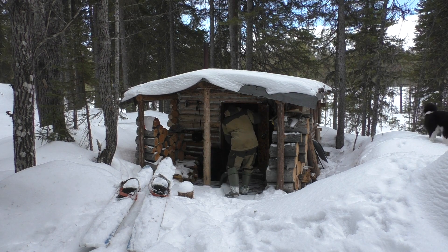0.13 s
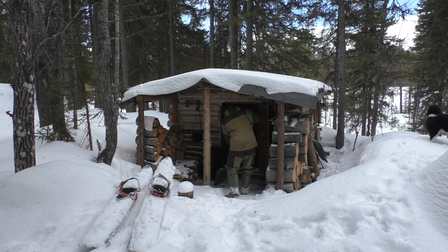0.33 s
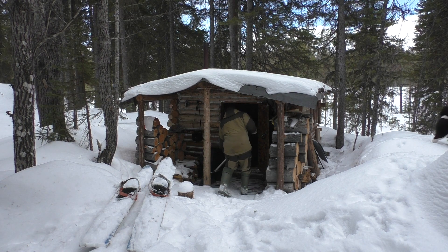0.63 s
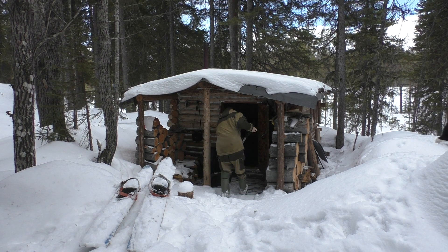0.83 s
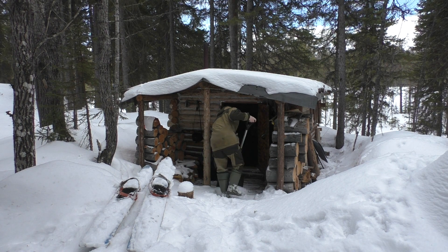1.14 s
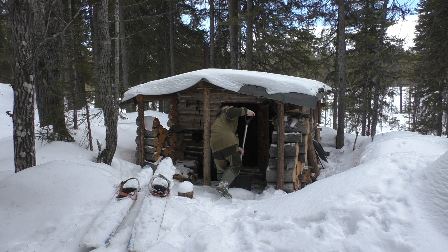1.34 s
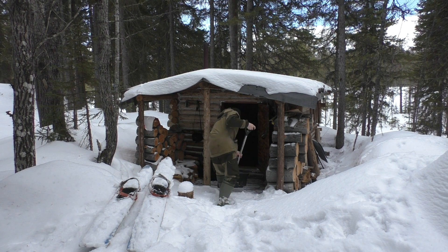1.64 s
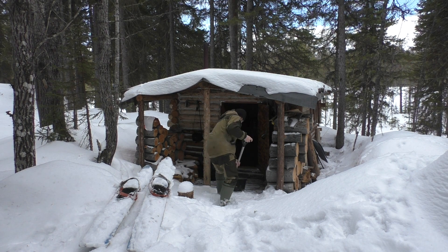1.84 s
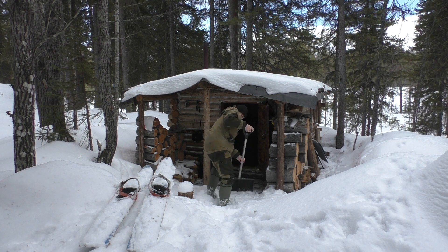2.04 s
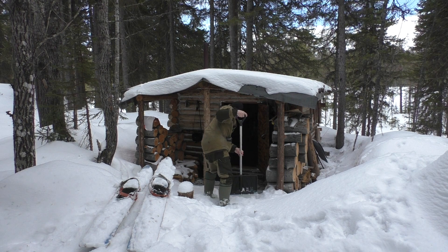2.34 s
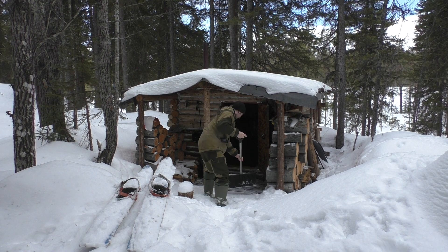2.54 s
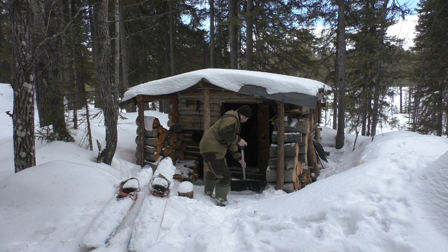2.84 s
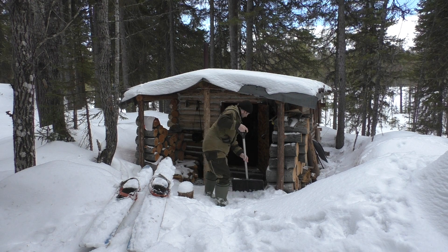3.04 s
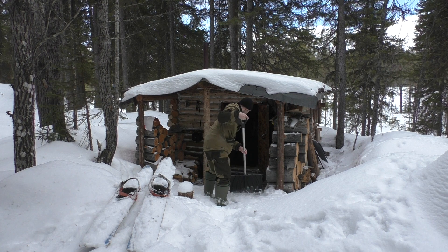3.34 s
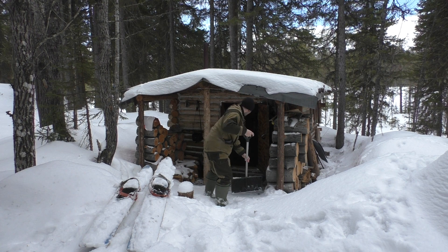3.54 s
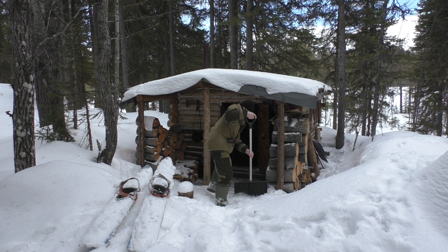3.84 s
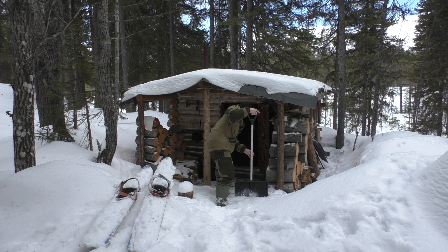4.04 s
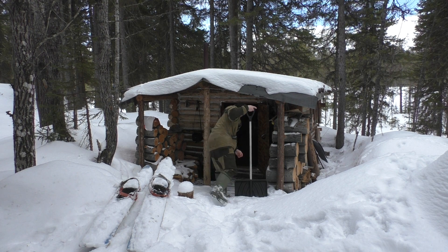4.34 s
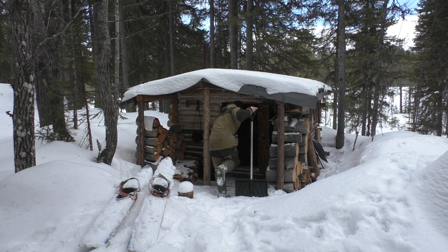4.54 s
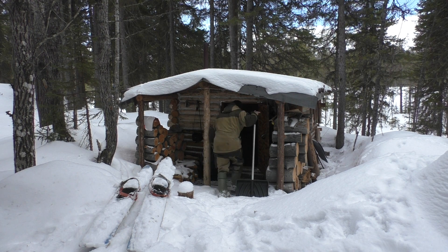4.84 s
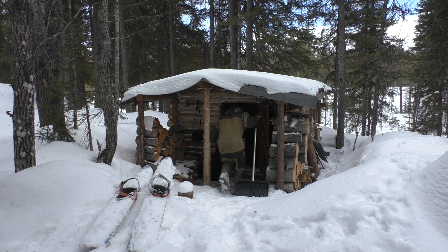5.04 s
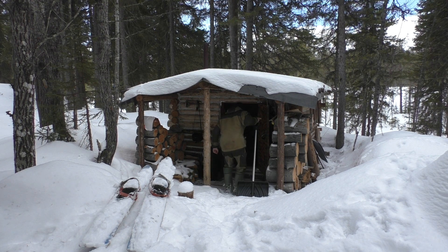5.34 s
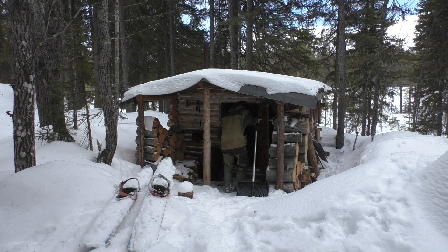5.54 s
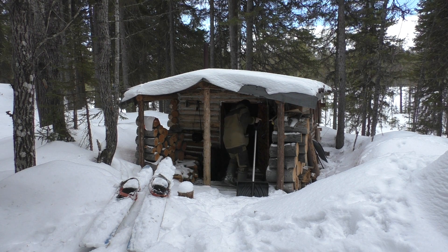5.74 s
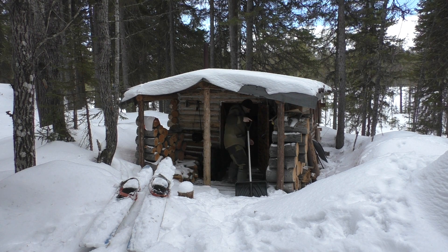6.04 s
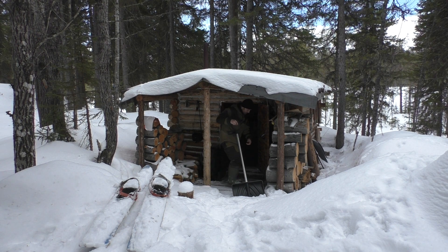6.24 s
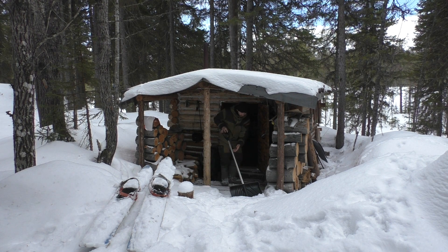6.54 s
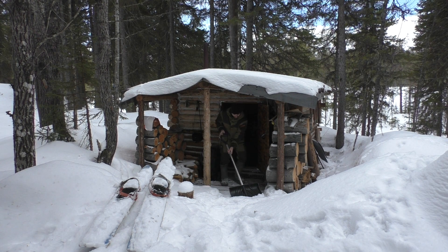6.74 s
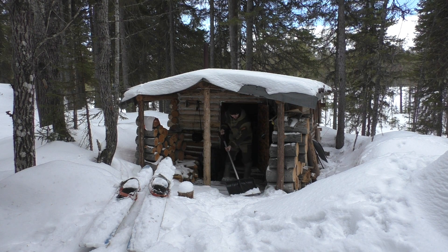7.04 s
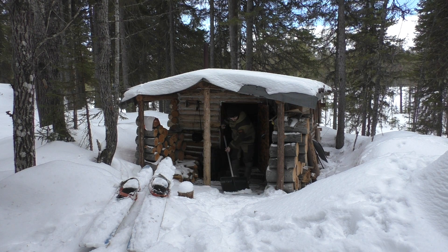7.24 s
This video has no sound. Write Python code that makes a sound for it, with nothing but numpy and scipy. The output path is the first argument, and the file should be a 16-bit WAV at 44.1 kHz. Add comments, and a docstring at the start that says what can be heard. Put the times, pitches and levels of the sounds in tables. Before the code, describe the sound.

Faint air hiss and low rumble lie under gritty shovel work outside a wooden hut. The plastic blade lands with dull knocks, shudders over hard crust and grates through icy grains, with pauses between strokes. Short dry scrapes end the work, then cloth brushes and boots thump on the floorboards over crunching snow. Quiet shuffling follows before the shovel briefly scrapes again. Outdoor mono pickup, fairly dry, with a slight echo of logs and trees.

```python
"""Snow is cleared at the door of a log hut in a quiet winter forest, over a faint hiss and rumble of air.
For four seconds a plastic shovel lands with knocks (fading tones), judders over the crust and scrapes
through icy grains (random clicks through the blade's resonances), with two soft footsteps in between.
Then clothes rustle (shaped noise) and boots thud on a wooden floor (fading board tones) over crunching snow.
Near the end the shovel gives one last short scrape and knock."""
import sys
import numpy as np
from scipy import signal
from scipy.fft import rfft, irfft, next_fast_len
from scipy.io import wavfile
from scipy.ndimage import uniform_filter1d, map_coordinates

SR = 44100
rng = np.random.default_rng(int(sys.argv[2]) if len(sys.argv) > 2 else 0)


def output_pcm(signal):
    """Save a mono or channel-first signal as 16-bit PCM at the path in sys.argv[1].

    Samples are clipped to [-1, 1] before scaling.
    """
    pcm = np.clip(np.atleast_2d(signal).T, -1, 1) * 32767
    wavfile.write(sys.argv[1], SR, np.round(pcm).astype(np.int16))


N = 325458  # length in samples


def amp(db):
    """Turn decibels into gain."""
    return 10 ** (np.asarray(db) / 20)


def unit(x):
    """Scale to an average (rms) level of 1."""
    return x / np.sqrt(np.mean(x ** 2) + 1e-20)


def along(points, hz):
    """Read a curve of (Hz, value) points, with pitch on a log axis."""
    f, v = np.transpose(points)
    return np.interp(np.log(hz + 1), np.log(f + 1), v)


def add(track, s, sound):
    """Mix a sound into the track at time s, in seconds."""
    part = track[max(round(s * SR), 0):][:len(sound)]
    part += sound[:len(part)]


def bump(t, rise, length):
    """Gain that rises in a straight line, holds for about length and falls away."""
    return np.minimum(t / rise, 1) / (1 + (t / length) ** 4)


def burst(s, length, rise=0.0026):
    """A whole track of gain with one bump at time s."""
    gain, t = np.zeros(N), np.arange(SR // 2) / SR
    add(gain, s, bump(t, rise, length))
    return gain


# loose crumbs trickle on after a push: starting level against full force, then how fast it fades
SPILL_DB, SPILL_DB_PER_S = -21, 110


def push(s, rise, hold, release_db_per_s, sag_db_per_s):
    """Gain of one push: force builds, sags while held, then lets go and leaves a faint trickle."""
    gain, t = np.zeros(N), np.arange(SR) / SR
    after = np.maximum(t - rise - hold, 0)
    force = np.minimum(t / rise, 1) * amp(-sag_db_per_s * np.clip(t - rise, 0, hold))
    release = amp(-release_db_per_s * after)
    spill = amp(SPILL_DB - SPILL_DB_PER_S * after)
    add(gain, s, force * np.maximum(release, spill))
    return gain


def wobble(rate):
    """A smooth random curve with rate random points a second."""
    points = rng.standard_normal(int(N * rate / SR) + 4)
    return map_coordinates(points, [np.arange(N) / SR * rate])


def filtered(x, response):
    """Multiply the spectrum of x by a response that depends on frequency."""
    m = next_fast_len(N + SR // 2)
    return irfft(rfft(x, m) * response(np.fft.rfftfreq(m, 1 / SR)), m)[:N]


def coloured(x, spectrum):
    """Shape x with a spectrum of (Hz, dB) points, at rms 1."""
    return unit(filtered(x, lambda hz: amp(along(spectrum, hz))))


def rung(x, modes):
    """Let x ring a body's resonances, at rms 1; neighbouring ones have opposite signs."""
    def response(f):
        total = 0
        for k, (centre, width, db) in enumerate(modes):
            damping = 1j * f * width
            total = total + (-1) ** k * amp(db) * damping / (centre ** 2 - f * f + damping)
        return total
    return unit(filtered(x, response))


def grains(rate, spread_db, clump_db):
    """Tiny fractures, about rate a second, of random size that swell in clumps, at rms 1."""
    hits = rng.random(N) < rate / SR
    size = amp(spread_db * rng.standard_normal(N) + clump_db * wobble(260))
    return unit(hits * size * rng.choice([-1, 1], N))


def patchy(x, depth_db, count=5):
    """Each band swells and fades on its own as the contact point and the load move, at rms 1."""
    z = signal.stft(x, nperseg=1024)[2]
    field = rng.standard_normal(z.shape)
    for axis in (0, 1):  # smooth over pitch, then over time
        field = uniform_filter1d(field, count, axis=axis)
    return unit(signal.istft(z * amp(depth_db * unit(field)), nperseg=1024)[1][:N])


# Colour of the hiss of still air: f/Hz, level/dB (per Hz)
AIR_COLOUR = [(12, -17), (20, 8.5), (44, 0.5), (187, -13.5), (443, -15), (843, -20.5), (1150, -21),
              (1430, -24), (2800, -27), (4020, -27.5), (9830, -33.5), (14500, -41.5), (15800, -42)]
AIR_DB = -52


def forest():
    """Still air: steady noise makes a faint hiss, and low noise of wavering level a rumble."""
    hiss = amp(AIR_DB) * coloured(rng.standard_normal(N), AIR_COLOUR)
    rumble = coloured(rng.standard_normal(N), [(25, -5), (70, -8), (200, -25), (800, -50)])
    return hiss + amp(-66.5 + 2.4 * wobble(7.7)) * rumble


# Movements of the body: t/s, hold/s, rustle level/dB, shuffling level/dB
BODY_MOVES = [(4.171, 0.22, -57, -52), (4.56, 0.21, -46.5, -50), (4.941, 0.14, -46.5, -51),
              (6.117, 0.25, -61, -73), (6.505, 0.29, -58.5, -52), (6.95, 0.089, -51, -53)]
# Colour of brushing cloth: f/Hz, level/dB (per Hz)
CLOTH_COLOUR = [(120, -0.5), (200, 0.5), (923, -9.5), (1590, -10.5), (1910, -8), (2850, -15), (3890, -12.5),
                (9310, -30), (15500, -41)]
# Colour of shuffling feet: f/Hz, level/dB (per Hz)
SHUFFLE_COLOUR = [(12, -53), (20, 1), (43, -5), (81, 13), (135, -17.5), (500, -10), (650, -53),
                  (1100, -120)]
MOVE_RISE_S, MOVE_FADE_DB_PER_S = 0.037, 117  # a move starts softly and dies away


def rustle():
    """A jacket brushes (grains) and feet shuffle (noise) on the way into the hut; each move swells and fades."""
    brush, shuffle = np.zeros((2, N))
    for s, hold, cloth_db, shuffle_db in BODY_MOVES:
        # a negative sag: the motion grows slightly while held
        motion = push(s, MOVE_RISE_S, hold, MOVE_FADE_DB_PER_S, sag_db_per_s=-2)
        brush += amp(cloth_db) * motion
        shuffle += amp(shuffle_db) * motion
    cloth = patchy(coloured(grains(rate=5000, spread_db=3.0, clump_db=1.7), CLOTH_COLOUR), depth_db=3.0)
    feet = coloured(rng.standard_normal(N), SHUFFLE_COLOUR)
    folds = amp(0.36 * wobble(25))
    return folds * (brush * cloth + shuffle * feet)


# Boots landing: t/s, thud level/dB, crunch level/dB, crunch length/s
BOOT_STEPS = [(1.657, -31, -47.5, 0.091), (2.514, -36, -55, 0.087), (4.376, -30, -49.5, .044),
              (4.839, -37, -43.5, 0.015), (4.894, -58, -46, 0.015), (4.958, -45, -48, 0.068),
              (5.01, -11, -27, 0.029), (5.404, -12, -36, 0.039), (5.677, -15, -42, 0.027),
              (6.123, -47, -49.5, 0.054), (6.677, -37, -54, 0.042), (7.006, -36.5, -54, 0.049)]
# Tones of the floor boards: f/Hz, level/dB (against the thud), time to fall 60 dB/s
FLOOR_BOARDS = [(45, -4.5, 0.17), (53.3, -25, 0.94), (80, 0.5, 0.067), (127.6, -0.5, 0.046),
                (193, -10, 0.045), (293, -17, 0.055)]
# Colour of snow crunching under a sole: f/Hz, level/dB (per Hz)
CRUNCH_COLOUR = [(100, 9.5), (300, 9.5), (700, 5.5), (1400, -1), (2200, -6), (4000, -7.5), (8000, -23),
                 (11000, -24), (16000, -34)]


def boots(settle_s=0.01177):
    """Snow crunches under the sole, then the weight drops and the floor boards ring and fade."""
    thuds, t = np.zeros(N), np.arange(SR // 2) / SR
    press = np.zeros(N)
    for s, thud_db, crunch_db, length in BOOT_STEPS:
        thud = np.zeros(len(t))
        for hz, level, t60 in FLOOR_BOARDS:
            varied = level + rng.normal(0, 1)  # every step rings the boards a little differently
            thud += amp(varied - 60 * t / t60) * np.sin(2 * np.pi * hz * t)
        add(thuds, s + settle_s, -amp(thud_db) * thud * (1 - np.exp(-t / 0.0021)))
        press += amp(crunch_db) * burst(s, length, rise=0.0016)
    crystals = coloured(grains(rate=9000, spread_db=3, clump_db=2), CRUNCH_COLOUR)
    return thuds + press * patchy(crystals, depth_db=2.5)


# The blade lands or hits a bump: t/s, level/dB, f/Hz of its flexing, time to fall 60 dB/s
BLADE_KNOCKS = [(0.045, -31, 247, 0.044), (.718, -14, 291, 0.1), (0.741, -13.5, 304, 0.13),
                (.887, -17.5, 133, 0.16), (.931, -16.5, 135, 0.13), (0.993, -10.5, 137, 0.1),
                (1.03, -11.5, 204.3, 0.26), (1.109, -16, 134, 0.082), (1.14, -22, 280, 0.12),
                (1.8747, 1.5, 249, 0.01), (1.931, -14.5, 171, 0.071), (1.999, -15.5, 86, 0.066),
                (2.823, -20.5, 114, 0.082), (2.868, 0, 136, 0.01), (2.9139, -11, 97.5, .12),
                (7.361, -19, 109, 0.069)]


def knocks():
    """A blow flexes the scoop at a pitch set by its load; a stiffer mode dies sooner."""
    out, t = np.zeros(N), np.arange(SR // 4) / SR
    for s, db, hz, t60 in BLADE_KNOCKS:
        flex = np.sin(2 * np.pi * hz * t) * amp(-60 * t / t60)
        stiff = amp(-13.5) * np.sin(2 * np.pi * 1.5 * hz * t) * amp(-60 * t / (0.64 * t60))
        add(out, s, amp(db) * (flex + stiff) * (1 - np.exp(-t / 0.00046)))
    return out


# The edge bites a lump of ice and one mode of the shovel sings: t/s, level/dB, length/s, f/Hz of that mode
# (the scraping below also uses these bites)
ICE_BITES = [(.036, -32.5, 0.019, 946), (.114, -27, 0.018, 2057), (0.12, -42, 0.031, 3820),
             (0.784, -38.5, 0.027, 817), (1.06, -38, 0.062, 950), (1.268, -25.5, 0.015, 721),
             (1.322, -25.5, .022, 1130), (1.999, -29.5, 0.03, 1176), (2.863, -25.5, 0.0066, 974),
             (2.911, -27, 0.0052, 3650), (2.983, -13.5, 0.0053, 1202), (3.098, -28, .045, 306),
             (3.156, -23.5, 0.01, 1444), (3.7505, -21.5, 0.0098, 1208), (3.803, -32, 0.041, 304),
             (3.864, -27.5, 0.015, 1182), (4.063, -34, 0.014, 1443), (7.337, -28.5, 0.061, 439)]
SING_DB = 1.5  # the singing mode against its bite


def catches(waver=2.16, steady_hz=1600, outlast=1.09):
    """Uneven slips keep a mode going through its bite, so its phase wanders and the note is rough."""
    out, t = np.zeros(N), np.arange(SR // 5) / SR
    drift = waver * wobble(110)  # radians, before the scaling by pitch
    for s, db, length, hz in ICE_BITES:
        wander = np.roll(drift, -round(s * SR))[:len(t)] * hz / (hz + steady_hz)
        note = np.sin(2 * np.pi * hz * t + wander)
        add(out, s, amp(db + SING_DB) * bump(t, 0.003, outlast * length) * note)
    return out


# The blade is pushed through the snow: t/s, rise/s, hold/s, scrape level/dB,
# icy hiss level/dB (against the scrape), judder level/dB, hardness of the crust/dB
SNOW_PUSHES = [ (0.0, 0.001, 0.016, -44, -9, -39, 5), (0.032, 0.0053, 0.053, -39, -10.5, -29, 0),
               (0.102, .012, 0.046, -26.5, -17, -32, 3.5), (0.166, 0.0095, 0.079, -38.5, -13.5, -30, -4),
               (0.715, 0.002, 0.0094, -29.5, -13, -17.5, -3), (0.788, 0.0058, 0.12, -39, -8.5, -30.5, -0.5),
               (0.86, 0.028, .09, -34, -10.5, -22.5, -1.5), (0.976, 0.017, .122, -29.5, -16.5, -21, -8),
               (1.136, 0.0056, 0.047, -26, -13, -29, 0.5), (1.187, 0.092, 0.12, -25, -13.5, -32.5, -1),
               (1.407, 0.02, .01, -23, -10.5, -29.5, 0.5), (1.867, 0.0081, 0.034, -34, -14.5, -23, -5.5),
               (1.916, 0.059, 0.19, -22, -10, -33, 0), (2.215, 0.014, 0.12, -46.5, -8.5, -70, 0.5),
               (2.805, 0.0077, 0.037, -48, -17, -47.5, 3), (2.858, .005, 0.132, -28.5, -16, -26, -10),
               (2.952, 0.025, 0.12, -25.5, -7.5, -36.5, 1.5), (3.095, .015, 0.053, -23, -9, -32, -1),
               (3.218, 0.015, 0.02, -29.5, -4.5, -40.5, 5.5), (3.721, 0.029, .003, -40.5, -2, -52, 6),
               (3.738, 0.012, 0.025, -20.5, -8, -33.5, 1.5), (3.787, 0.0073, 0.014, -39.5, -12, -41, 2),
               (3.856, 0.0045, 0.0036, -34, -5, -49, 7.5), (3.905, 0.0074, 0.012, -30, -5, -40.5, 0),
               (4.05, 0.0098, .014, -27, -13.5, -33.5, -12), (7.332, 0.0054, .045, -24, -14, -39, -2)]
# Icy crumbs crackle: t/s, level/dB, length/s
ICY_CRUMBS = [(2.801, -49.5, 0.028), (3.438, -47, 0.0044), (4.805, -54, .016), (4.84, -62, 0.011),
              (5.405, -55, 0.062), (5.55, -62, 0.017), (6.112, -57, .035), (6.675, -60, .03)]
# The blade's ringing under the scrape: f/Hz, width/Hz, level/dB
BLADE_MODES = [(738, 27, 1), (941, 31, 1), (1159, 53, 2.5), (1462, 42, 0.5), (1963, 490, -4.5),
               (3690, 660, -2.5), (4410, 330, -4), (7140, 840, -18)]
# The whole scoop flexing: f/Hz, width/Hz, level/dB
SCOOP_MODES = [(97, 33.4, -5), (166, 14.6, -1), (201, 28.3, 3), (293, 26.6, 2)]
# The hollow of the scoop: f/Hz, width/Hz, level/dB
HOLLOW_MODES = [(428, 20, 7), (550, 82, -1.5), (756, 80, -4), (947, 44, -2.5)]
# Colour of breaking crust: f/Hz, level/dB (per Hz)
CRUST_COLOUR = [(25, 9.5), (90, -2.5), (300, -3), (550, -3.5), (1100, -2), (2600, -7.5), (4000, -9),
                (5300, -15.5), (9000, -61), (16000, -37)]
# Colour of icy hiss: f/Hz, level/dB (per Hz)
ICE_COLOUR = [(2500, -12.5), (5000, 2.5), (7000, 0.5), (9000, -3), (11000, -9.5), (13000, -15.5),
              (16000, -28.5)]
SAG_DB_PER_S = 20.5  # the blade slows as it fills
RELEASE_DB_PER_S, SHAKE_DB_PER_S = 388, 302  # after a push: how fast the scrape and the judder die
HARD_HZ = 1920  # a harder crust is louder above this


def scraping():
    """The edge breaks icy grains that ring the blade, while stick and slip shake the scoop."""
    scrape, grit, hiss, judder = np.zeros((4, N))
    for s, rise, hold, scrape_db, hiss_db, judder_db, hard_db in SNOW_PUSHES:
        force = amp(scrape_db) * push(s, rise, hold, RELEASE_DB_PER_S, SAG_DB_PER_S)
        shake = amp(judder_db) * push(s, rise, hold, SHAKE_DB_PER_S, SAG_DB_PER_S)
        # where pushes overlap, the stronger one counts
        scrape = np.maximum(scrape, force)
        grit = np.maximum(grit, amp(hard_db) * force)
        hiss = np.maximum(hiss, amp(hiss_db) * force)
        judder = np.maximum(judder, shake)
    bite = sum(amp(db) * burst(s, length) for s, db, length, _ in ICE_BITES)
    crumbs = sum(amp(db) * burst(s, length) for s, db, length in ICY_CRUMBS)

    crust = coloured(grains(rate=6000, spread_db=2.5, clump_db=1.5), CRUST_COLOUR)
    blade = rung(grains(rate=3000, spread_db=3.5, clump_db=3.5), BLADE_MODES)
    body = patchy(crust + amp(-2) * blade, depth_db=2.5)
    dull = filtered(body, lambda hz: 1 / (1 + (hz / HARD_HZ) ** 4))
    bright = body - dull
    crunch = np.hypot(scrape, bite) * dull + np.hypot(grit, bite) * bright

    ice = patchy(coloured(grains(rate=10000, spread_db=7.0, clump_db=-1.0), ICE_COLOUR), depth_db=4)
    icy = (np.hypot(hiss, amp(-14.5) * bite) + crumbs) * ice

    slips = grains(rate=600, spread_db=0.5, clump_db=4.5)
    scoop_colour = [(40, -5.5), (80, 5.0), (320, -5.0), (430, 1), (900, -37)]
    scoop = coloured(rung(slips, SCOOP_MODES), scoop_colour)
    scoop = scoop + amp(-11.5) * rung(slips, HOLLOW_MODES)

    grip = amp(1.07 * wobble(70))  # the crust is uneven under the edge
    return grip * (crunch + icy) + judder * scoop


# Echo of hut and trees: f/Hz, time to fall 60 dB/s
ECHO_FADE = [(100, 0.18), (500, 1), (1200, 1), (4000, 0.75), (12000, 0.85)]


def echo(x):
    """The logs and trees scatter a tail: noise that fades at its own speed in each band."""
    hz, t, z = signal.stft(rng.standard_normal(SR), SR, nperseg=256)
    fade = amp(-60 * t / along(ECHO_FADE, hz)[:, None])
    tail = signal.istft(z * fade, SR, nperseg=256)[1]
    return signal.fftconvolve(x, tail / np.linalg.norm(tail))[:N]


def scene():
    """Shovel and boots with their faint echo, clothes and forest air."""
    work = scraping() + catches() + knocks() + boots()
    return (work + amp(-24.5) * echo(work) + rustle() + forest())[None]


TOP_HZ = 15850


def record(dry):
    """The recorder rounds off the highest peaks and keeps nothing above its band limit."""
    rounded = dry[0] / (1 + (dry[0] / 0.52) ** 6) ** (1 / 6)  # never exceeds 0.52
    return filtered(rounded, lambda hz: hz < TOP_HZ)[None]


dry = scene()
out = record(dry)
output_pcm(out)
```